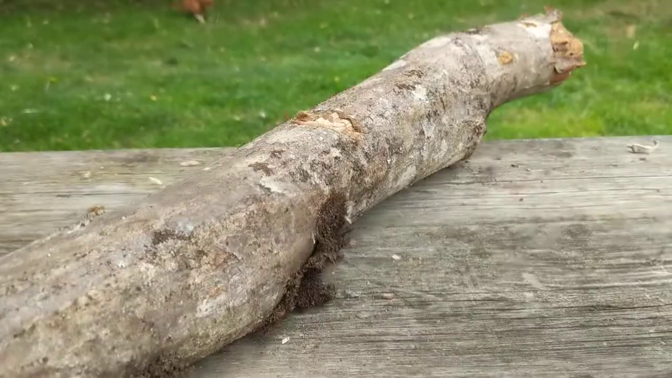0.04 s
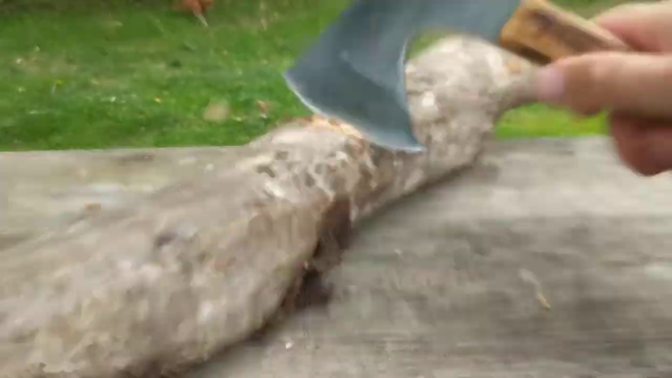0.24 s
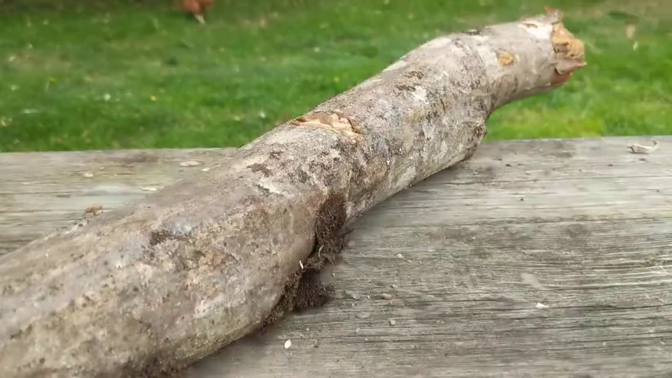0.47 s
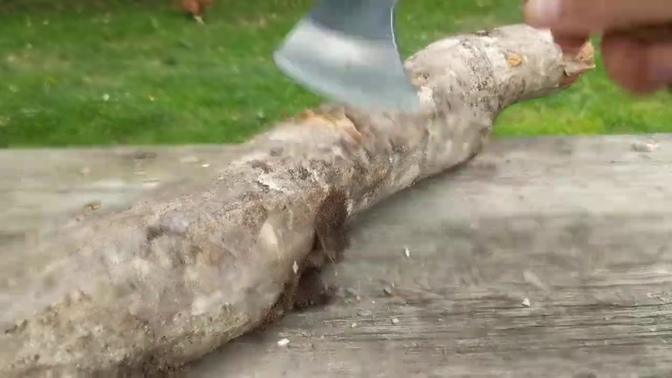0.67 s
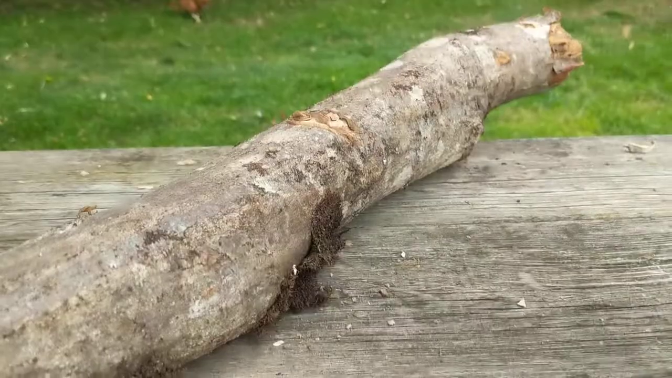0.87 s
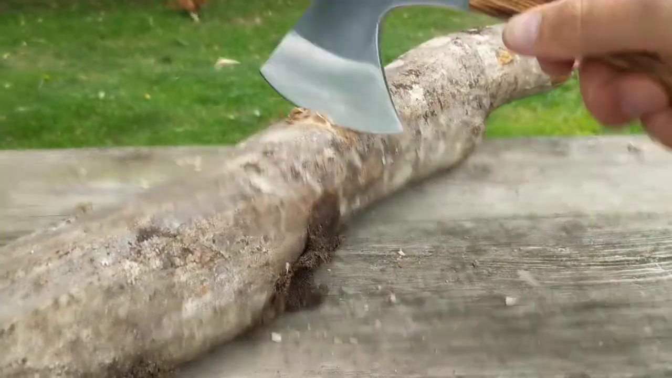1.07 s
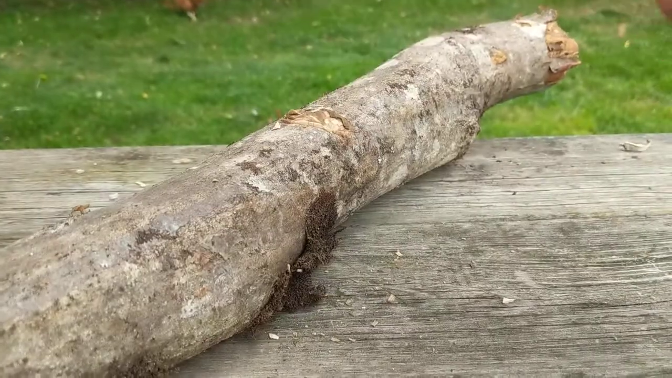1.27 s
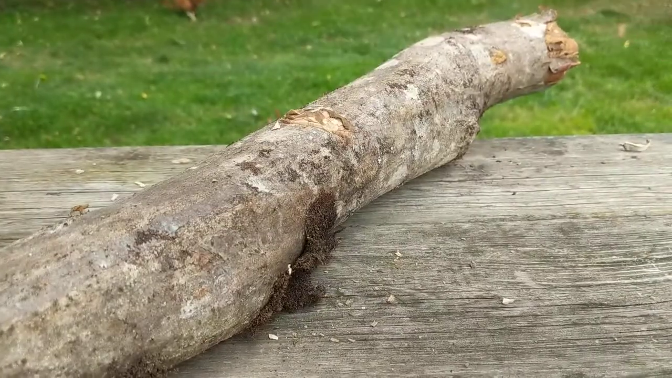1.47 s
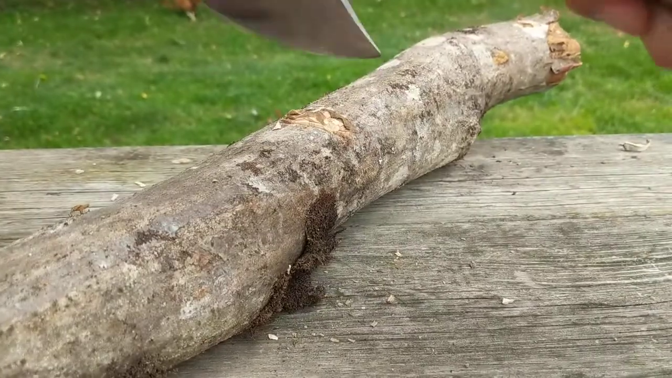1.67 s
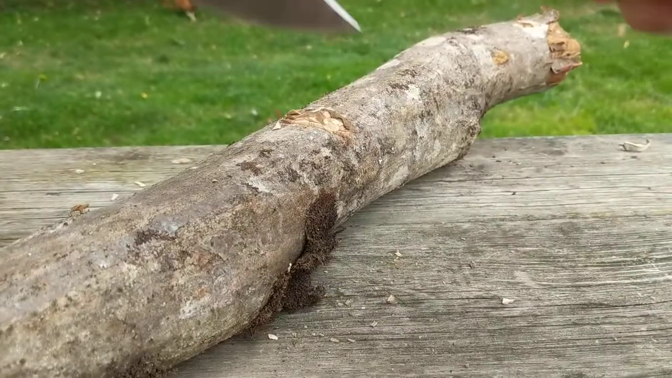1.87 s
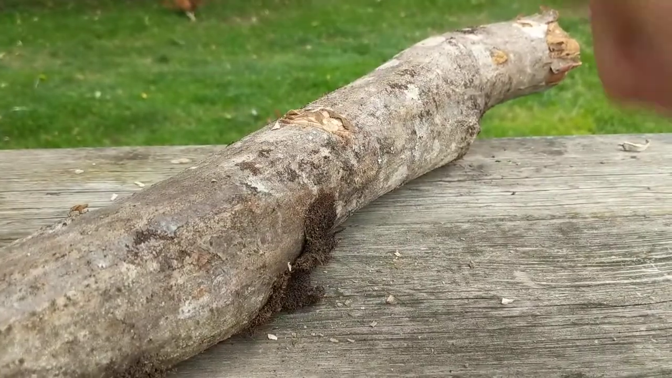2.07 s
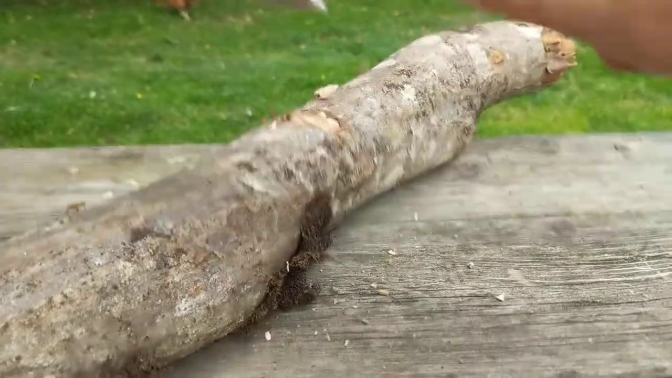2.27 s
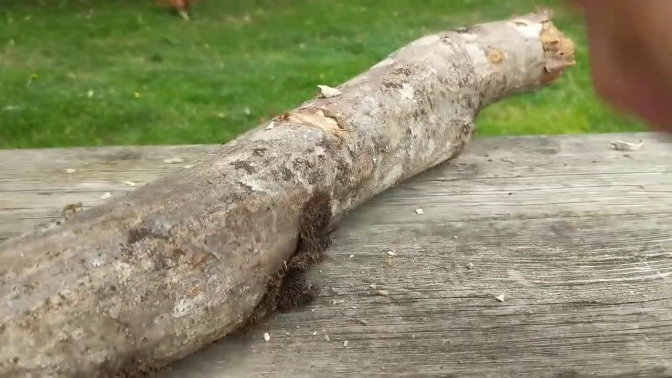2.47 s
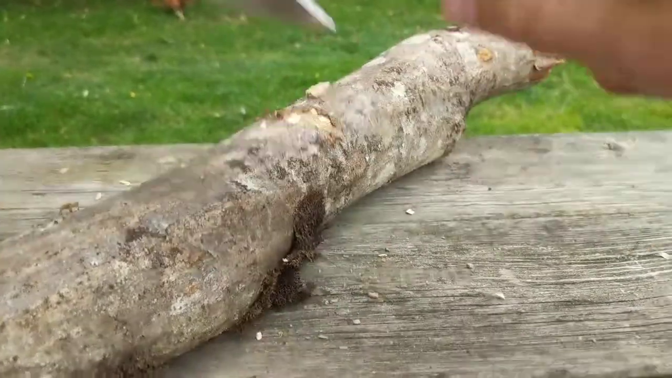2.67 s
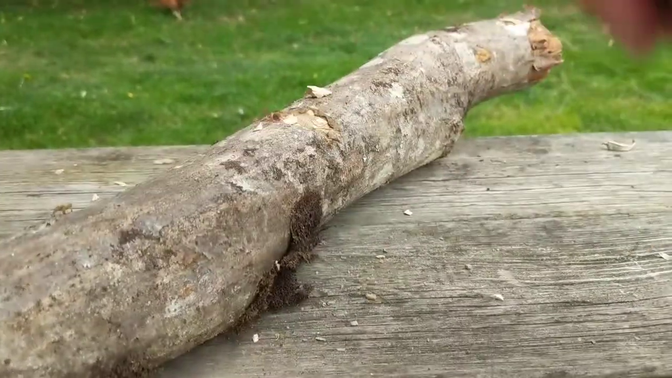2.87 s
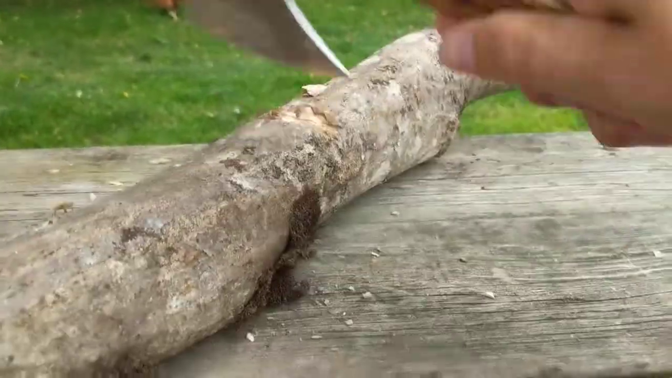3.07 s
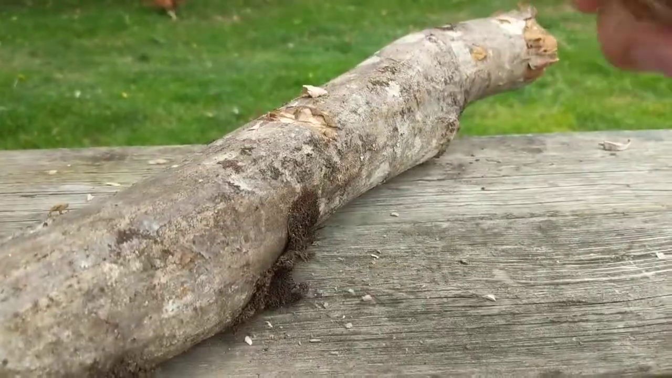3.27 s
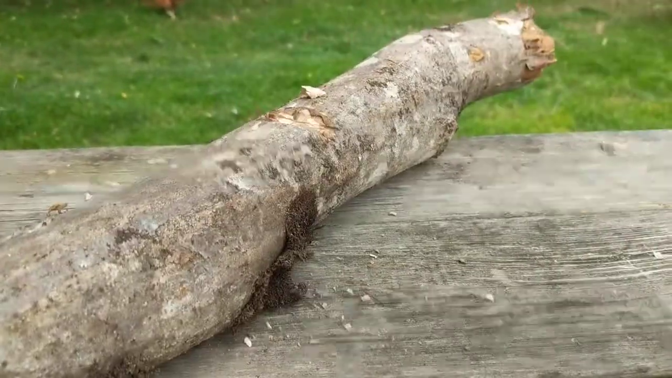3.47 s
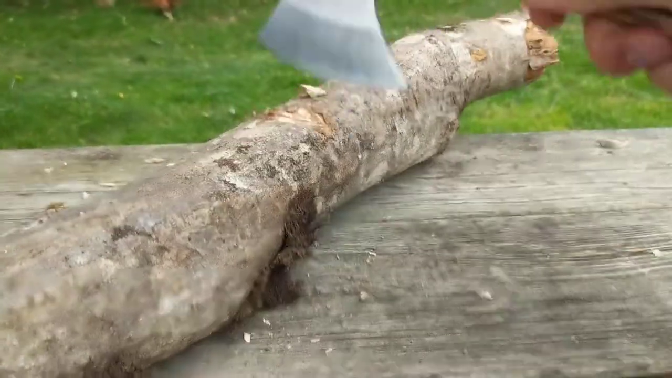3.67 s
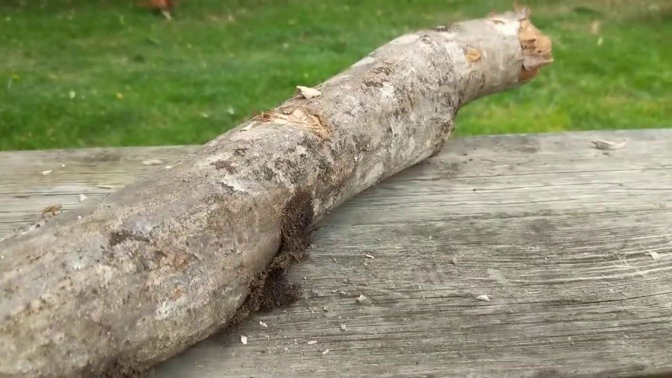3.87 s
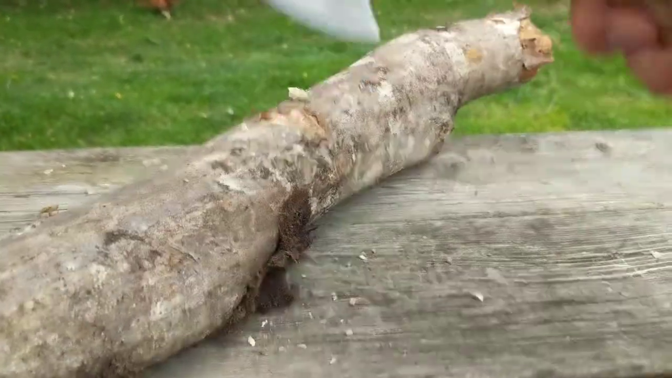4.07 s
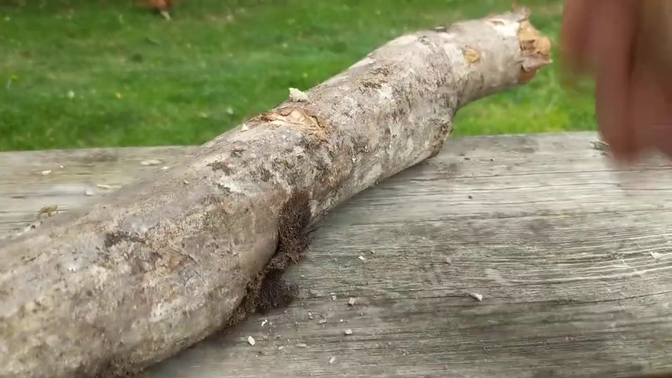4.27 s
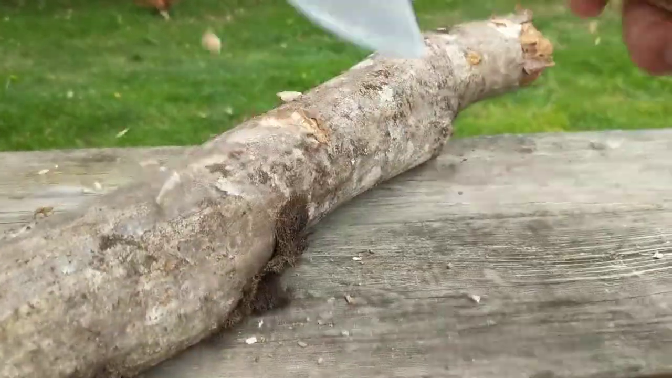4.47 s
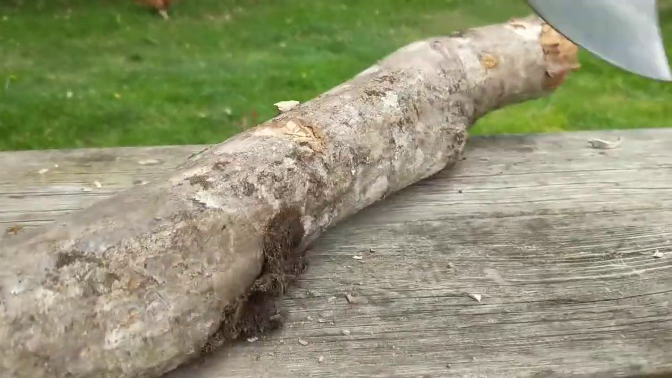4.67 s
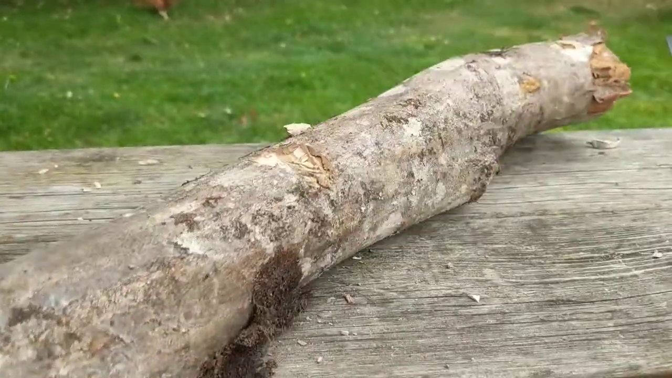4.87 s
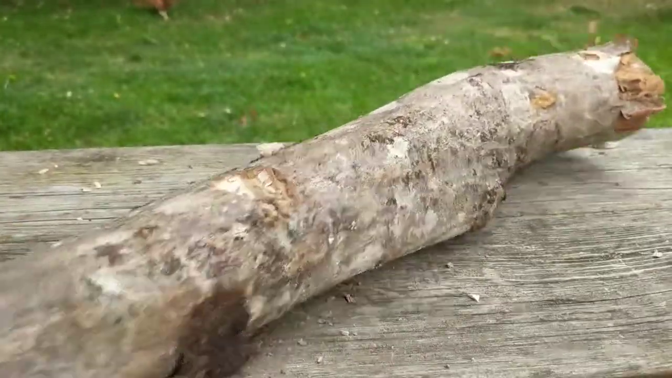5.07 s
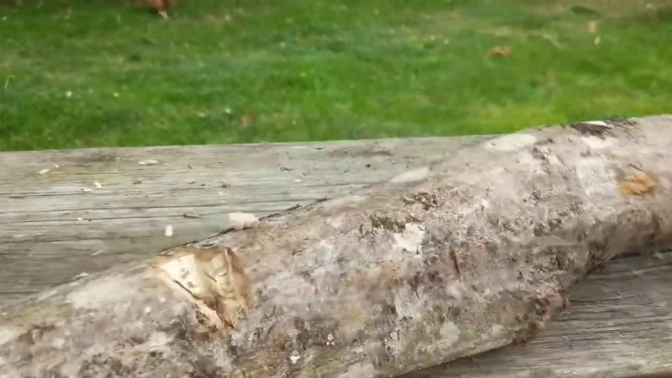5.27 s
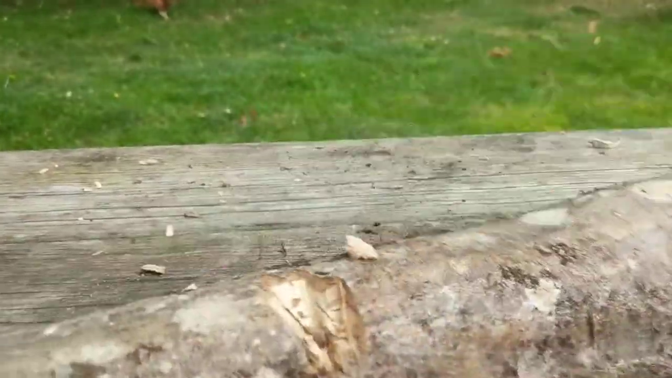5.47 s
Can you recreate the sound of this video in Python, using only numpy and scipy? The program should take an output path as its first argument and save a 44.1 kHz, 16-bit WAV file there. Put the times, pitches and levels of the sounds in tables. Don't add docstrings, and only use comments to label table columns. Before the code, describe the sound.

A hatchet bites wood nine times with dry, knocking cracks; near silence falls between blows, then bark rumbles and scrapes over planks.

```python
import sys
import numpy as np
from scipy import signal
from scipy.fft import rfft, irfft
from scipy.io import wavfile
from scipy.ndimage import uniform_filter1d, map_coordinates

SR = 44100
rng = np.random.default_rng(int(sys.argv[2]) if len(sys.argv) > 2 else 0)


def log_audio(samples):
    frames = np.atleast_2d(samples).T
    limited = np.clip(frames, -1, 1)
    pcm = np.round(limited * 32767).astype(np.int16)
    wavfile.write(sys.argv[1], SR, pcm)


def ratio_of_db(decibels):
    return 10 ** (np.asarray(decibels, float) / 20)


N = 243873
T = np.arange(N) / SR

# t/s, edge peak level/dB, knock level/dB, upper knock level/dB, bite level/dB
BLOWS = [
    (0.2702, -16, -12.5, -15, -17),
    (0.651, -9, -13, -12.5, -19.5),
    (1.032, -11, -14.5, -10, -15.5),
    (2.1868, -13, -14.5, -16, -20),
    (2.5922, -10, -14.5, -14.5, -20.5),
    (3.0067, -12.5, -14.5, -15, -23),
    (3.6489, -7.5, -14, -14.5, -22),
    (4.0243, -9.5, -12, -17.5, -24.5),
    (4.376, -14.5, -12, -13, -19.5),
]
DEBRIS_DB = [1, .5, 1, .5, -3, -3.5, 2.5, 1, 1]
# t/s, peak level/dB, f/Hz
CHIPS = [(0.192, -45, 8620), (0.343, -41, 7960), (0.555, -53, 3220), (0.7237, -40, 8100),
         (0.771, -48.5, 8330), (0.848, -50, 8100), (0.9234, -52, 2970), (1.093, -37.5, 8430),
         (1.267, -54, 4440), (1.3604, -46, 7220), (1.4418, -60, 3450), (1.5378, -52, 8270),
         (1.6564, -56.5, 8560), (1.723, -52, 7900), (2.159, -54, 2980), (2.5237, -54, 3000),
         (2.6874, -57, 4500), (3.0978, -58, 2980), (3.7133, -37, 7500), (3.8506, -56, 3240),
         (4.1035, -44, 4630), (4.141, -37.5, 7500), (4.4467, -47, 7460), (4.4913, -40, 8300),
         (4.5307, -42, 3856), (4.694, -37.5, 7830), (4.8677, -46, 6360), (4.948, -43, 8000),
         (5.1352, -57, 4480), (5.3162, -50, 8800)]
# f/Hz, level/dB, T60/s
BENCH = [(120.3, -10.5, 0.33), (134.5, -7.5, 0.14), (158.4, 1.5, 0.098), (206.3, -1, 0.12), (256, 5, 0.069),
         (318.4, -6.5, 0.14)]
# f/Hz, level/dB, T60/s
BRANCH = [(388, -18, 0.086), (471.8, -6.5, 0.084), (521.5, -5, 0.076), (567, -1, .07), (686.5, -5, .07),
          (747.6, -0.5, 0.064), (855, -5.5, 0.044), (929, -4.5, 0.07), (1003, -3, 0.046),
          (1160, -14, 0.055), (1322, -16.5, .06), (1472, -16, 0.042), (1580, -12, .04), (1782, -8, .04),
          (2004, -15, 0.032)]
# f/Hz, level/dB per Hz
CRACK = [(880, -30), (1500, -0.5), (3250, -2), (4010, -5.5), (6490, -8.5), (8680, -9.5), (9990, -17.5),
         (12000, -34.5), (15500, -37.5), (16500, -48)]
# f/Hz, level/dB per Hz
SHAKE = [(53, -27.5), (90, -4.5), (231, -13), (307, -13.5), (828, -23), (947, -21), (1050, -28),
         (1440, -29), (2310, -43.5), (2730, -43), (5000, -51), (6500, -72.5), (11000, -120)]
# f/Hz, level/dB per Hz
RUMBLE = [(18, -45.5), (30, -8.5), (53, -1.5), (102, -2), (140, -6.5), (281, -22), (360, -29), (500, -25),
          (650, -50.5), (1100, -120)]
# f/Hz, level/dB per Hz
HISS = [(710, -34.5), (1200, -4), (1310, -0.5), (1490, -6), (2530, -5.5), (2890, -7), (4670, -8.5),
        (5390, -9.5), (7010, -10.5), (8730, -3.5), (12100, -35), (15300, -32.5), (16000, -32.5),
        (16500, -53.5)]
EARLIER_S = -0.085


def unit(x):
    return x / np.sqrt(np.mean(x ** 2) + 1e-20)


def wobble(rate):
    return map_coordinates(rng.standard_normal(int(N * rate / SR) + 4), [T * rate])


def noise(spectrum, size, patchy_db=0, streaky_db=0):
    z = signal.stft(rng.standard_normal(size + 2048), nperseg=512)[2]
    patches = uniform_filter1d(uniform_filter1d(rng.standard_normal(z.shape), 6, 0), 8, 1)
    streaks = uniform_filter1d(rng.standard_normal(z.shape), 7, 1)
    gain = ratio_of_db(patchy_db * unit(patches) + streaky_db * unit(streaks))
    x = signal.istft(z * gain, nperseg=512)[1]
    hz, db = np.transpose(spectrum)
    bins = np.fft.rfftfreq(len(x), 1 / SR) + 1
    colour = ratio_of_db(np.interp(np.log(bins), np.log(hz + 1), db))
    return unit(irfft(rfft(x) * colour, len(x))[:size])


def ring(modes, t, attack, scatter_db, bending=False):
    hz, db, t60 = np.transpose(modes)[:, :, None]
    level = ratio_of_db(db + scatter_db * rng.standard_normal(db.shape) - 60 * t / t60)
    sign = (-1.) ** np.arange(len(hz))[:, None] if bending else 1
    onset = 1 - np.exp(-t / attack)
    return -(sign * level * np.sin(2 * np.pi * hz * t)).sum(0) * onset


def add(track, s, sound):
    track[round(s * SR):][:len(sound)] += sound


def hatchet():
    # splinter level/dB, splinter f/Hz, edge f/Hz, air level/dB
    splits = [(-10, 3090, 5200, -47), (-10, 3060, 4660, -38), (-13, 2390, 4740, -43.5),
              (-17, 2960, 5300, -42), (-10.5, 3020, 8720, -38.5), (-16.5, 2990, 5200, -31),
              (-16.5, 3150, 9270, -33), (-16.5, 2900, 7100, -41), (-14, 3005, 8400, -38.5)]
    # f/Hz, level/dB, T60/s
    blade = [(4700, -6.5, .05), (5860, -8.5, 0.18), (7440, -10, 0.18), (8300, -1, 0.12), (8950, -10.5, .2)]
    # f/Hz, level/dB, T60/s
    legs = [(55.3, -7, 0.4), (64.5, -7, 0.36)]
    # t/s, f/Hz, level/dB,
    # T60/s
    pings = [(.013, 5850, -59, 0.19), (2.188, 3505, -27, .035), (.725, 5910, -59, .16),
             (.652, 4100, -27, .03), (1.095, 8410, -54, 0.098), (1.166, 7200, -67, 0.094),
             (1.241, 947, -63.5, 0.2), (4.0123, 8600, -56, 0.02), (4.113, 8300, -55, 0.2),
             (4.112, 7510, -62, 0.15), (4.451, 7440, -63, 0.12), (4.531, 3880, -60, 0.11),
             (5.391, 3400, -56, 0.073)]
    boom_db = -17.5
    out, t = np.zeros(N + SR), np.arange(SR // 2) / SR
    late = np.clip(t - 0.0005, 0, 1)
    for (s, edge_db, knock_db, upper_db, bite_db), fibres in zip(BLOWS, splits):
        wood = ratio_of_db(knock_db + 3) * ring(BRANCH[:5], late, attack=0.0014, scatter_db=1.1)
        wood += ratio_of_db(upper_db + 3) * ring(BRANCH[5:9], late, attack=0.0016, scatter_db=1.1, bending=True)
        wood += ratio_of_db(bite_db + 9) * ring(BRANCH[9:], late, attack=0.00042, scatter_db=1.5, bending=True)
        planks = ring(BENCH, t, attack=0.0006, scatter_db=1)
        sway = ring(legs, t, attack=0.0024, scatter_db=2.5, bending=True)
        settle = ratio_of_db(-11.5 - 60 * t / 0.21)
        settle += ratio_of_db(-31 - 60 * t / 0.5 - 320 * np.clip(t - 0.14, 0, 1))
        jolts = ratio_of_db(1.5 * wobble(200)[:len(t)])
        chatter = settle * jolts * (1 - np.exp(-t / 0.0021))
        rattle = ratio_of_db(knock_db) * chatter * noise(SHAKE, len(t), streaky_db=3)
        steel = ratio_of_db(edge_db - 44.5) * ring(blade, t, attack=0.003, scatter_db=1)
        crack = split(t, edge_db, *fibres)
        add(out, s, wood + ratio_of_db(boom_db) * (planks + sway) + crack + rattle + steel)
    for s, hz, db, t60 in pings:
        add(out, s, ring([(hz, db, t60)], t, attack=0.0015, scatter_db=0))
    return out[:N]


def split(t, edge_db, splinter_db, splinter_hz, edge_hz, air_db):
    ms = 2.7 * (5200 / edge_hz) ** 0.45
    parting = np.exp(-(1000 * t / ms) ** 2)
    running, tearing = ratio_of_db(-17 - 60 * t / 0.033), ratio_of_db(-35.5 - 60 * t / 0.12)
    burst = (1 - np.exp(-t / 0.0011)) * (parting + running + tearing)
    fibres = noise(CRACK, len(t))
    high = signal.sosfilt(signal.butter(2, 4500, "high", fs=SR, output="sos"), fibres)
    top = signal.butter(4, 10000, "high", fs=SR, output="sos")
    air = signal.sosfilt(top, rng.standard_normal(len(t)))
    snap = ring([(splinter_hz, -1.5, 0.014)], t, attack=0.00031, scatter_db=1)
    zing = ring([(edge_hz, -4, 0.011)], t, attack=0.0004, scatter_db=2)
    splinter = ratio_of_db(splinter_db) * (ratio_of_db(-1) * burst * (fibres - high) + ratio_of_db(3) * snap)
    edge = ratio_of_db(edge_db) * (ratio_of_db(0.5) * burst * high + ratio_of_db(1.5) * zing)
    return splinter + edge + ratio_of_db(air_db + 5 - 60 * t / 0.05) * burst * air


def drag():
    # t/s, effort level/dB
    pull = [
        (4.56, -54),
        (4.584, -52.5),
        (4.614, -59),
        (4.675, -58),
        (4.705, -44),
        (4.76, -34.5),
        (4.904, -46),
        (5.0, -51.5),
    ]
    # t/s, effort level/dB
    roll = [
        (5.04, -50),
        (5.136, -34),
        (5.2, -28),
        (5.31, -31),
        (5.375, -40),
        (5.43, -33),
        (5.462, -43),
        (5.53, -37),
    ]
    # f/Hz, level/dB per Hz
    scraping = [(150, -26.5), (250, 3.5), (393, -9), (525, 2), (694, -11), (1090, -12), (1300, -35),
                (1500, -23), (2500, -38.5), (3250, -45.5), (5500, -120)]
    knots_s, knots_db = np.transpose(pull + roll)
    effort_db = np.interp(T, knots_s, knots_db)
    moving = np.clip((T - pull[0][0]) / 0.0089, 0, 1)
    lumps = wobble(35)
    rumble = ratio_of_db(effort_db) * unit(ratio_of_db(1.5 * lumps) * noise(RUMBLE, N))
    scrape_db = -51.5 + 0.51 * (effort_db + 35.5)
    roughness = ratio_of_db(2.5 * lumps + 0.9 * wobble(90))
    scrape = ratio_of_db(scrape_db) * unit(roughness * noise(scraping, N, patchy_db=3))
    hiss_db = -57.5 + 2.2 * np.minimum(effort_db + 46.5, 0)
    grain = ratio_of_db(1.1 * wobble(120))
    hiss = ratio_of_db(hiss_db) * unit(grain * noise(HISS, N, patchy_db=0.8, streaky_db=3.5))
    return moving * (rumble + scrape + hiss)


def rest():
    # f/Hz, level/dB, T60/s
    free_modes = [(468, 0, 0.11), (764, -14, 0.15), (872, -5, 0.092), (1109, -22, 0.24), (1324, -19, 0.11),
                  (1846, -34, 0.16), (2277, -19, 0.025)]
    out, t = np.zeros(N + SR), np.arange(SR // 4) / SR
    scuff = ratio_of_db(-7 - 60 * t / 0.1) * noise(SHAKE[3:], len(t))
    tap = ratio_of_db(-3 - 60 * t / 0.2) * ring(free_modes, t, attack=0.0007, scatter_db=0, bending=True)
    add(out, 5.3885, ratio_of_db(-24.5) * (tap + scuff))
    return out[:N]


def knocks():
    # t/s, peak level/dB, brightness level/dB
    contacts = [(0.026, -58, 10), (0.19, -54, 9), (0.343, -32.5, -10.5), (1.138, -35, -10),
                (2.252, -30.5, -7.5), (2.339, -41, -7.5), (2.486, -44.5, -3), (2.728, -45, -15),
                (2.896, -50, -13), (3.074, -46, -2), (3.133, -46, -11), (3.371, -39.5, -20.5),
                (3.399, -49, -17.5), (3.533, -45, -15), (3.712, -33, 0), (4.111, -49, -15),
                (4.333, -51, -12.5), (4.478, -36, 1), (4.539, -46, -12), (5.323, -23, -16), (5.388, -35, 0),
                (2.295, -44, 1.5)]
    out, t = np.zeros(N + SR), np.arange(SR // 4) / SR
    for s, db, bright_db in contacts:
        thud = ratio_of_db(-6 - 60 * t / 0.15) * ring(BENCH, t, attack=0.0015, scatter_db=2.2)
        tap = ratio_of_db(bright_db - 5 - 60 * t / 0.2) * ring(BRANCH, t, attack=0.0006, scatter_db=2.5)
        puff = ratio_of_db(-60 * t / 0.05) * noise(SHAKE[2:], len(t))
        puff += ratio_of_db(-14.5 - 60 * t / 0.0066) * noise(CRACK, len(t))
        add(out, s, ratio_of_db(db) * (thud + tap + ratio_of_db(bright_db - 4) * puff))
    return out[:N]


def chips():
    out, t = np.zeros(N + SR), np.arange(SR // 20) / SR
    landings = [(*chip, 0.0087) for chip in CHIPS]  # t/s, level/dB, f/Hz, T60/s
    for blow, debris_db in zip(BLOWS, DEBRIS_DB):
        for u, v, w in rng.random(size=(14, 3)):
            crumb_db = -58.5 + debris_db + 9 * v - 6 * u
            landings.append((blow[0] + 0.023 + 0.097 * u, crumb_db, 3500 * 2.3 ** w, 0.041))
    hisses = noise(HISS[4:], 200 * len(t)).reshape(-1, len(t))
    for (s, db, hz, t60), hiss in zip(landings, hisses):
        tick = ratio_of_db(-60 * t / 0.0091) * hiss
        ping = ratio_of_db(-2.5 - 60 * t / t60) * np.sin(2 * np.pi * hz * t)
        add(out, s, ratio_of_db(db - 1.5) * (tick + ping) * (1 - np.exp(-t / 0.0004)))
    return out[:N]


def garden():
    # f/Hz, level/dB per Hz
    shut_air = [(15, -39.5), (25, -6.5), (70, 0), (252, -20.5), (321, -15.5), (399, -17), (726, -17),
                (809, -16), (1250, -20), (4730, -28.5), (8370, -33.5), (14800, -38), (16500, -50.5)]
    shudder = sum(ratio_of_db(-50 - 60 * (T - s) / 0.92) * (T >= s) for s, *_ in BLOWS)
    earlier_boom = ratio_of_db(-45 - 60 * T / 0.48)
    low = ratio_of_db(-70) + shudder + earlier_boom
    breeze = low * ratio_of_db(1.8 * wobble(45)) * noise(RUMBLE, N)
    hiss = gate() * ratio_of_db(3.5 * wobble(90)) * noise(HISS, N, patchy_db=2, streaky_db=4.5)
    return breeze + hiss + ratio_of_db(-67.5) * noise(shut_air, N)


def gate():
    # t/s, hold t/s, hiss level/dB
    nudges = [
        (.19, .012, -74),
        (4.582, 0.045, -70.5),
    ]
    spans = [(s, s + hold, db) for s, hold, db in nudges]
    blow_times = [EARLIER_S] + [blow[0] for blow in BLOWS]
    for s, debris_db in zip(blow_times, [0] + DEBRIS_DB):
        chip_ends = [c + 0.027 for c, db, _ in CHIPS if s < c < s + 0.16 and db > -49]
        spans.append((s, max(chip_ends + [s + 0.13]), -63 + debris_db))
    return sum(ratio_of_db(db - 600 * np.clip(T - shut, 0, 1)) * (T >= opens) for opens, shut, db in spans)


def scene():
    return (hatchet() + drag() + rest() + knocks() + chips() + garden())[None]


def roll_off(x):
    return signal.sosfilt(signal.butter(12, 16890, fs=SR, output="sos"), x)


def record(dry):
    x = signal.sosfilt(signal.butter(6, 45, "high", fs=SR, output="sos"), dry)
    x = x / (1 + np.abs(x / 0.72) ** 7) ** (1 / 7)
    x = signal.sosfilt(signal.cheby2(16, 80, 16950, fs=SR, output="sos"), x)
    return roll_off(x)


dry = scene()
out = record(dry)
log_audio(out)
```